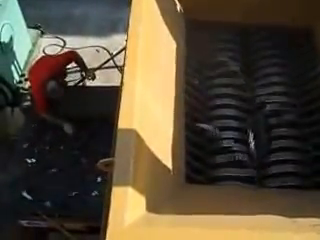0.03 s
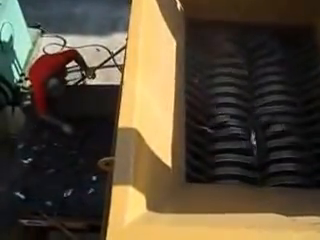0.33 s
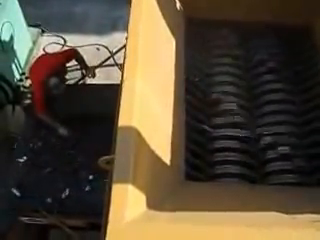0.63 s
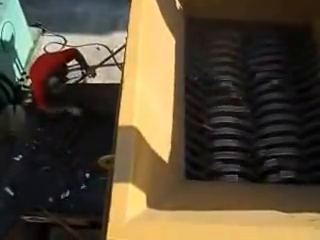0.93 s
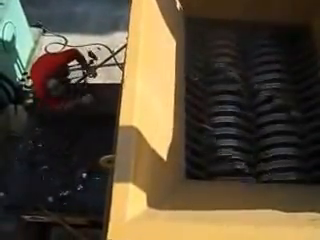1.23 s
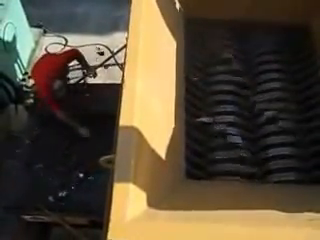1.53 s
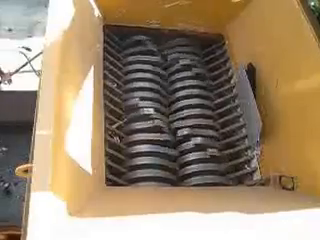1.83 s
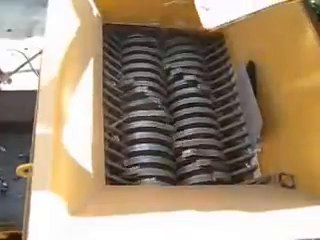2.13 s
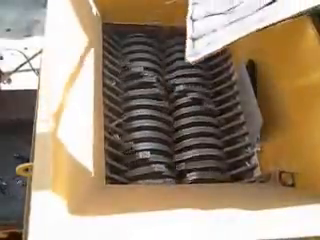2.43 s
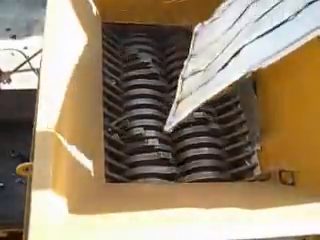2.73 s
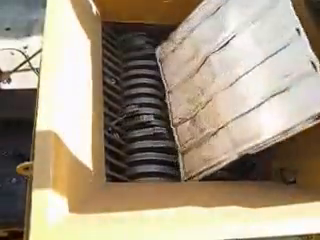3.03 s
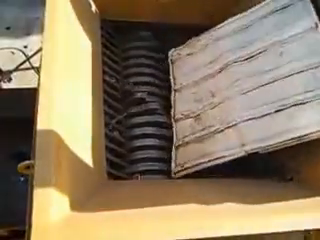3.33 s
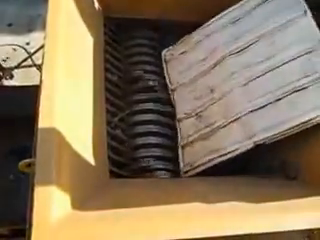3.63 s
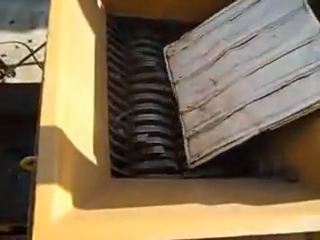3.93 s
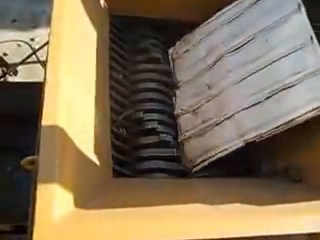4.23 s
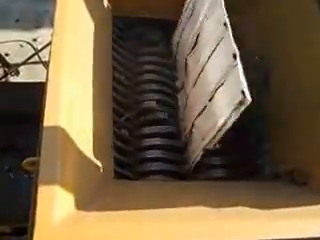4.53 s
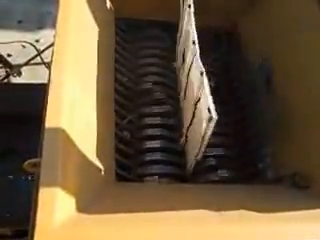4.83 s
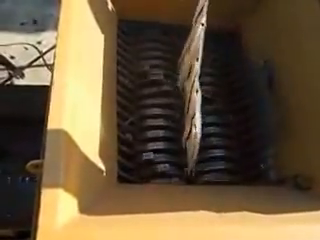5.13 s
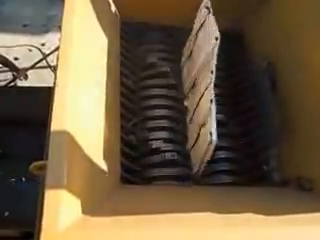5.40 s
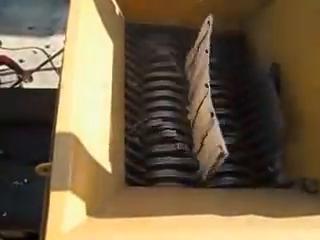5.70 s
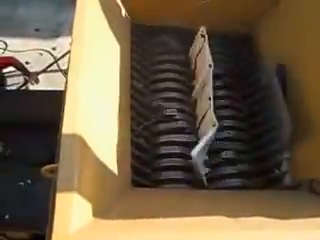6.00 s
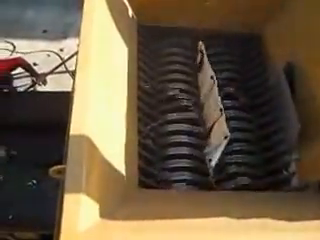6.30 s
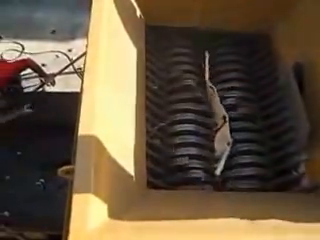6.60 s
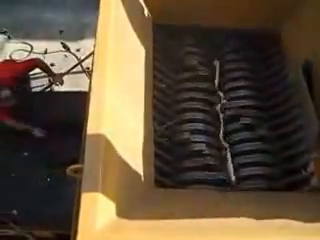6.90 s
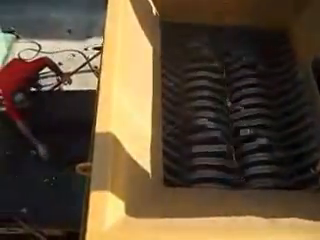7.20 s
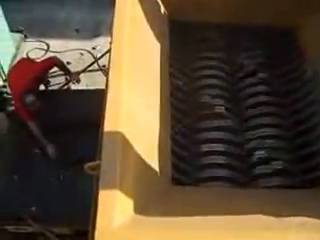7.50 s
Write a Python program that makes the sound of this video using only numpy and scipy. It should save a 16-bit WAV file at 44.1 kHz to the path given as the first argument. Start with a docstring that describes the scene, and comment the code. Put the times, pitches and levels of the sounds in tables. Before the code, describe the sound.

A large scrap shredder runs in a yard with a throbbing engine roar, rattling cutters, a thin pump whistle and a few light clinks. About three seconds in, a metal panel lands in the steel hopper and is dragged through with loud, irregular booms, clangs, scrapes and crunches. The last strip gives a brief high squeal, and the machine runs on. The microphone is close above the hopper.

```python
"""A twin-shaft scrap shredder roars and throbs in a yard, its cutters rattling and its pump whistling.
A ribbed metal panel drops into the steel hopper. The cutters drag it in, buckle it with booms and tear it
with crunches: runs of tiny fractures excite the modes of the panel and the ring of the hopper walls.
The last strip squeals between the discs by stick-slip friction.
The limiter of a camera above the hopper holds the loud moments down."""
import sys
import numpy as np
from scipy import signal
from scipy.fft import rfft, irfft, next_fast_len
from scipy.io import wavfile
from scipy.ndimage import uniform_filter1d, map_coordinates

SR = 44100
rng = np.random.default_rng(int(sys.argv[2]) if len(sys.argv) > 2 else 0)


def unload_audio(sound):
    """Save the sound as a 16-bit wav file, at the path given as the first command line argument."""
    columns = np.transpose(np.atleast_2d(sound))
    # keep every value between -1 and 1, then stretch to whole-number steps
    steps = np.round(np.clip(columns, -1, 1) * 32767)
    wavfile.write(sys.argv[1], SR, steps.astype(np.int16))


N = 341775

# the running machine: time_s, engine_db, rattle_db
MACHINE_LEVELS = [(0, -28, -26), (1.2, -27.5, -27.5), (1.6, -28.5, -27.5), (2.2, -29, -29),
                  (2.9, -28, -28.5), (3.5, -25, -30), (5.8, -27.5, -28.5), (6.5, -27, -26), (7.3, -28, -28),
                  (7.75, -29, -28.5)]
# spectrum of the engine: frequency_hz, gain_db
ENGINE_SPECTRUM = [(25, -42), (45, -29), (65, -14.5), (120, -9.5), (180, -6), (250, 0), (340, -1.5),
                   (440, 0), (600, -3), (930, 0.5), (1500, -2), (2000, -4.5), (3500, -16), (8000, -44)]
# spectrum of the empty cutters: frequency_hz, gain_db
RATTLE_SPECTRUM = [(500, -47), (1200, -9.5), (1750, -1), (2000, -4), (2400, 0.5), (2800, 1), (3200, -2),
                   (3900, -4.5), (4900, -8), (5800, -14.5), (7500, -15.5), (9000, -18), (10000, -23.5),
                   (11000, -48)]
# modes of the cutter discs: pitch_hz, gain_db
DISC_MODES = [(2155, -2), (2385, 1), (2735, -1), (2830, -1), (2940, -6)]
# narrow resonances of the running machine: pitch_hz, half_width_hz, level_db
WHINE_RESONANCES = [(66, 7.4, -60), (256.4, 9.3, -50.5), (272, 7.2, -46.5), (435, 37, -42.5),
                    (736, 18, -46), (890, 43, -42), (985, 15, -48), (1154, 24, -41.5), (1363, 18, -44)]
# the hydraulic pump's whistle: time_s, level_db
PUMP_LEVELS = [(0, -41), (.5, -39.5), (1.12, -35), (1.4, -40), (1.7, -40), (2.1, -52), (7.75, -44)]
# loose scraps strike the empty cutters: start_s, level_db, pitch_hz
SCRAP_CLINKS = [(.445, -37, 1290), (.772, -38, 1400), (.776, -31, 3200), (1.078, -28, 1890),
                (1.145, -28, 2130), (1.378, -33, 2300), (1.742, -28, 2000), (2.68, -30, 2760)]
# the panel skids over the teeth uncaught: start_s, length_s, grind_db, scrape_db
PANEL_SKIDS = [(3.015, 0.062, -29, -27.5), (3.144, 0.07, -26.5, -31), (3.456, 0.14, -23.5, -33),
               (3.675, 0.042, -23.5, -34), (4.092, 0.13, -19, -27.5), (4.224, 0.075, -24, -29.5),
               (5.125, 0.03, -42, -29.5), (5.406, 0.056, -27, -26), (5.96, 0.05, -42, -27.5),
               (6.39, 0.066, -22, -28)]
# the panel in the cutters, flexing less as it gets shorter: time_s, flex_db, grind_db
FEED_LEVELS = [(3.03, -37, -33), (3.25, -26, -26), (3.41, -32.5, -39), (3.92, -27.5, -27),
               (4.25, -29.5, -26), (4.62, -27, -32), (5.1, -35.5, -32), (5.82, -32.5, -33.5),
               (6.75, -38, -29), (7.3, -53, -39)]
# low modes of the panel: pitch_hz, gain_db, t60_s
PANEL_MODES = [(68, -28, 0.18), (130, -13.5, 0.3), (185, -7.5, 0.33), (224.5, -5, 0.26), (245, -5, 0.35),
               (301.6, -1, 0.27), (326, -7, 0.12), (369.4, 1, 0.17), (411, 0, 0.14), (455, 1, 0.16),
               (527, -4.5, 0.093)]
# the whole panel rings low; crumpled and shorter, it rings higher: time_s, favoured_hz
CRUMPLE_PITCH = [(3.1, 240), (3.75, 215), (4.1, 215), (4.25, 312), (7.3, 352)]
# spectra of crumpling metal, from dull to bright: frequency_hz, gain_db
THUD_SPECTRUM = [(35, -36), (70, -22), (100, -12), (135, -4), (250, -1), (490, -1.5), (640, -14),
                 (1300, -32.5)]
CLANG_SPECTRUM = [(30, -22), (100, -12), (300, -18), (500, -3), (680, -1), (900, 1.5), (1200, -0.5),
                  (1750, 0), (2100, -8.5), (2800, -11.5), (5000, -39), (10000, -63)]
CRACK_SPECTRUM = [(500, -44), (1500, -0.5), (2700, 5.5), (4000, 1.5), (5000, -6.5), (6200, -9.5),
                  (8500, -11), (10500, -24)]
# the sheet rips along a cutter's edge: start_s, tearing_s, crack_db, clang_db
SHEET_RIPS = [(3.024, 0.027, -23, -22.5), (3.195, .025, -26, -20), (3.068, 0.037, -36, -21),
              (3.525, 0.023, -30, -32), (4.047, 0.012, -27, -37), (4.345, 0.05, -26, -29),
              (4.416, 0.054, -22, -33), (4.657, 0.015, -32, -28), (4.796, 0.031, -22, -19),
              (4.979, 0.061, -28.5, -28), (5.159, 0.022, -31, -30), (5.32, 0.02, -27.5, -25),
              (5.514, 0.019, -26, -20), (6.195, 0.032, -29, -25), (7.24, 0.024, -29, -29),
              (7.368, 0.038, -29, -29), (7.606, 0.039, -24.5, -41)]
# the panel drones while it lies on the cutters: time_s, level_db
DRONE_LEVELS = [(3.15, -44), (3.73, -42.5), (3.8, -39), (3.99, -37), (4.06, -43), (4.35, -40)]
# modes that groan as the sheet is dragged in: pitch_hz, half_width_hz, gain_db
DRONE_MODES = [(127.4, 5, 1), (231, 12, 4), (297, 7.4, 4.5)]
# a tooth buckles the panel:
# start_s, tearing_s, clang_db, clang_hz, crack_db, boom_db, boom_hz, breadth_log_pitch
TOOTH_BITES = [(3.16, .04, -23, 1100, -30, -28.5, 190, .6), (3.228, 0.032, -27, 1100, -42, -21.5, 227, 0.1),
               (3.452, .02, -24, 1080, -25, -26, 380, .4), (3.474, 0.028, -21, 720, -34, -19.5, 410, 0.37),
               (3.51, 0.032, -19, 720, -27, -23, 450, 0.59), (3.548, 0.049, -25, 1100, -30, -21, 368, .45),
               (3.7, 0.023, -23, 900, -37, -26.5, 440, 0.24),
               (3.768, 0.062, -21, 1100, -31, -21, 243, 0.44),
               (3.885, .02, -30, 950, -38, -28.5, 250, 0.32), (3.94, .02, -26, 950, -47, -29, 260, 0.66),
               (3.995, .02, -30, 950, -38, -28, 270, .4), (4.135, .028, -18, 1300, -32, -22, 380, 0.66),
               (4.175, 0.038, -22, 1050, -25, -21.5, 248, 0.22),
               (4.385, .025, -29, 1200, -27, -21.5, 350, .35), (4.425, 0.023, -21, 1100, -30, -25, 236, .3),
               (4.52, 0.038, -17.5, 1150, -21, -17.5, 340, 0.28),
               (4.562, 0.0097, -20, 900, -27, -21, 310, 0.48),
               (4.63, 0.022, -35, 1100, -45, -25.5, 340, 0.48),
               (4.697, 0.014, -17, 1500, -23.5, -18, 440, .4),
               (4.795, 0.023, -26, 1110, -33, -22, 340, 0.16),
               (4.845, 0.023, -25, 1000, -32, -16, 307, 0.28),
               (5.03, 0.042, -15, 1390, -22.5, -19.5, 300, 0.89),
               (5.208, .022, -20.5, 1000, -27, -18, 322, 0.11),
               (5.364, 0.045, -20, 1100, -44, -28, 300, 0.54), (5.564, 0.014, -22, 1110, -37, -37, 303, .5),
               (5.734, 0.031, -18.5, 1020, -29, -14.5, 320, .65),
               (5.911, .033, -24, 1000, -27, -24, 280, .6),
               (6.089, 0.012, -19.5, 1000, -27, -20.5, 210, 0.61),
               (6.245, 0.013, -36, 1110, -42, -26.5, 305, 0.34),
               (6.408, 0.021, -22.5, 1200, -26, -24, 370, 0.35),
               (6.445, .028, -21, 1200, -29, -25, 427, .4), (6.463, .012, -25, 1110, -33, -21, 410, 0.23),
               (6.643, 0.013, -22.5, 1110, -31, -23, 350, 0.45),
               (6.791, 0.019, -24, 1110, -34, -26, 400, 0.44), (6.828, 0.021, -25, 1400, -26, -41, 400, .5)]
# squeaks and groans of a caught edge: start_s, length_s, pitch_hz, glide_octaves, peak_db
EDGE_SQUEAKS = [(3.451, .018, 1184, -0.016, -15), (3.458, 0.016, 844, -.55, -16),
                (3.576, .016, 930, -0.078, -21), (4.075, 0.099, 758, 0.46, -24),
                (4.326, .016, 3020, 0, -21), (4.335, .055, 1200, .32, -22), (4.35, .018, 3720, -0.18, -24),
                (4.378, 0.013, 2830, -.1, -21), (4.973, 0.044, 3900, 0, -31),
                (5.16, 0.031, 1500, -0.21, -20), (5.427, .02, 3300, 0, -25),
                (6.208, 0.021, 2360, -0.038, -20), (6.504, 0.019, 2790, 0.019, -18.5),
                (6.908, .025, 2640, 0.015, -26), (6.965, 0.027, 2330, 0.014, -15.5),
                (6.966, 0.022, 9680, 0, -39), (6.985, 0.039, 5400, .05, -31), (6.987, .05, 9050, .03, -41),
                (7.008, 0.036, 2950, 0, -19.5), (7.022, 0.05, 2294, 0, -25)]
# the last strip screeches in two modes: time_s, lower_hz, upper_hz
SQUEAL_PITCHES = [(6.915, 3600, 8200), (6.94, 4080, 7950), (6.963, 4150, 7760), (6.998, 3850, 8100),
                  (7.02, 4080, 7950), (7.046, 3650, 8350), (7.059, 4080, 7900), (7.068, 4150, 8150)]

TIME_S = np.arange(N) / SR


def amp(db):
    """Decibels to amplitude ratio."""
    return 10 ** (np.asarray(db) / 20)


def unit(x):
    """Scale to rms 1."""
    return x / np.sqrt(np.mean(x ** 2) + 1e-20)


def unit_burst(x):
    """Scale so that the loudest 25 ms have rms 1."""
    return x / np.sqrt(uniform_filter1d(x ** 2, SR // 40).max())


def gain_at(spectrum, hz):
    """Amplitude gain of a spectrum, interpolated over log frequency."""
    knots_hz, db = np.transpose(spectrum)
    return amp(np.interp(np.log(hz + 1), np.log(knots_hz + 1), db))


def bell(hz, centre_hz, breadth):
    """A Gaussian over log pitch, 1 at the centre."""
    return np.exp(-(np.log((hz + 1) / centre_hz) / breadth) ** 2)


def curves(rows):
    """Linear interpolation, per sample, of each column after the time."""
    times_s, *columns = np.transpose(rows)
    return [np.interp(TIME_S, times_s, column) for column in columns]


def during(rows, fade_s):
    """A gate: 1 while a table lasts, fading to 0 outside it."""
    start, end = rows[0][0], rows[-1][0]
    return np.interp(TIME_S, [start - fade_s, start, end, end + fade_s], [0, 1, 1, 0])


def wobble(rate_hz):
    """Smooth random modulation: a spline through Gaussian knots."""
    knots = rng.standard_normal(int(N * rate_hz / SR) + 4)
    return map_coordinates(knots, [TIME_S * rate_hz])


def phase_of(hz):
    """Phase is the time integral of frequency."""
    return 2 * np.pi * np.cumsum(hz) / SR


def filtered(x, response):
    """Linear filtering: the spectrum of x times a frequency response."""
    size = next_fast_len(len(x) + 8192)
    return irfft(rfft(x, size) * response(np.fft.rfftfreq(size, 1 / SR)), size)[:len(x)]


def coloured(x, spectrum):
    """Spectral shaping, at rms 1."""
    return unit(filtered(x, lambda hz: gain_at(spectrum, hz)))


def resonances(modes):
    """Narrow resonances, each driven by its own white noise."""
    track = np.zeros(N)
    for pitch_hz, half_width_hz, db in modes:
        band = filtered(rng.standard_normal(N), lambda hz: 1 / (1 + ((hz - pitch_hz) / half_width_hz) ** 2))
        track += amp(db) * unit(band)
    return track


def impulses(size, per_s):
    """Shot noise: tiny fractures or impacts of random time and strength, at rms 1."""
    return unit((rng.random(size) < per_s / SR) * rng.standard_normal(size))


def add(track, start_s, sound):
    """Superpose a sound on the track."""
    part = track[round(start_s * SR):][:len(sound)]
    part += sound[:len(part)]


def shifting(x, ring_at):
    """Time-varying convolution: the metal moves, so each cross-faded stretch meets its own ring."""
    hop, track = SR // 7, np.zeros(N)
    padded, fade = np.pad(x, (0, 2 * hop)), np.sqrt(np.hanning(2 * hop))
    for start in range(0, N, hop):
        stretch = padded[start:start + 2 * hop] * fade
        add(track, start / SR, signal.fftconvolve(stretch, ring_at((start + hop) / SR)))
    return track


def walls(t60_s, wet_db):
    """Impulse response of the steel hopper: direct sound and a short, dense tail."""
    t = np.arange(SR // 4) / SR
    tail = rng.standard_normal(len(t)) * amp(-60 * t / t60_s) * (t > .002)
    return (t == 0) + amp(wet_db) * tail / np.linalg.norm(tail)


def in_hopper(x, t60_s, wet_db):
    """Reverberation of one short sound between the hopper walls."""
    return signal.fftconvolve(x, walls(t60_s, wet_db))[:len(x)]


def engine_roar(throb_db):
    """Amplitude modulation of broadband noise makes the engine throb."""
    return coloured(amp(throb_db) * rng.standard_normal(N), ENGINE_SPECTRUM)


def cutter_rattle(throb_db):
    """Dense impacts reverberate in the hopper and merge with noise into a rattle."""
    impacts = impulses(N, per_s=1500) * amp(wobble(25))
    ticks = shifting(impacts, lambda s: walls(t60_s=.11, wet_db=1.5))
    return coloured(amp(throb_db) * (rng.standard_normal(N) + .41 * ticks), RATTLE_SPECTRUM)


def disc_ring(throb_db, t60_s=.12):
    """Free vibration of struck cutter discs; the point of contact sets the strength of each mode."""
    t = np.arange(SR // 5) / SR
    hz, db = np.transpose(DISC_MODES)[:, :, None]

    def ring_at(s):
        modes = amp(db + 3 * rng.standard_normal(hz.shape)) * np.sin(2 * np.pi * hz * t)
        return unit(modes.sum(0) * amp(-60 * t / t60_s))

    return unit(shifting(impulses(N, per_s=60) * amp(throb_db), ring_at))


def pump_whistle(throb_db, pitch_hz=2236, waver=.0062):
    """The hydraulic pump's tone, modulated in amplitude and slightly in frequency."""
    tone = np.sin(phase_of(pitch_hz * (1 + waver * wobble(120))))
    return unit(amp(throb_db + 1.5 * wobble(20)) * tone)


def machine(cycle_hz=13.7, first_throb_s=.067):
    """Common modulation: engine, cutters and pump throb in one cycle, under the fan's steady whine."""
    engine_db, rattle_db = curves(MACHINE_LEVELS)
    pump_db, = curves(PUMP_LEVELS)
    cycle = 2 * np.pi * cycle_hz * (TIME_S - first_throb_s) + .42 * wobble(2.7)
    throb = np.cos(cycle) * (1 - .5 * during(FEED_LEVELS, fade_s=.22))  # half as deep under load
    flutter_db = .41 * np.sin(6 * cycle) + .34 * wobble(30)  # six firings a cycle
    roar = amp(engine_db) * engine_roar(throb_db=.4 * throb + flutter_db)
    rattle = amp(rattle_db) * cutter_rattle(throb_db=1.05 * throb + flutter_db)
    discs = amp(rattle_db - 12.5) * disc_ring(throb_db=6 * throb)
    pump = amp(pump_db) * pump_whistle(throb_db=6 * throb)
    fan = resonances(WHINE_RESONANCES)
    return roar + rattle + discs + pump + fan


def clinks(mode_count=9, log_spread=.17, chatter_s=.0047, t60_s=.11):
    """Impact excitation: a scrap chatters on a disc and rings in its own inharmonic modes."""
    track, t = np.zeros(N), np.arange(SR // 5) / SR
    for start_s, level_db, pitch_hz in SCRAP_CLINKS:
        modes_hz = pitch_hz * np.exp(log_spread * rng.standard_normal((mode_count, 1)))
        ring = np.sin(2 * np.pi * modes_hz * t).sum(0) * amp(-60 * t / t60_s)
        contacts = impulses(len(t), per_s=1800) * np.exp(-t / chatter_s)
        chatter = in_hopper(contacts, t60_s=.08, wet_db=-6)
        add(track, start_s, amp(level_db) * unit_burst(signal.fftconvolve(chatter, ring)[:len(t)]))
    return track


def skid_gains(attack_s=.0088, release_s=.046):
    """Envelopes of sliding friction, for grinding and scraping: rise, hold and exponential decay."""
    grind, scrape = np.zeros(N), np.zeros(N)
    for start_s, length_s, grind_db, scrape_db in PANEL_SKIDS:
        t = TIME_S - start_s
        stroke = np.clip(t / attack_s, 0, 1) * np.exp(-np.maximum(t - length_s, 0) / release_s)
        grind += amp(grind_db) * stroke
        scrape += amp(scrape_db) * stroke
    return grind, scrape


def panel_ring(detune, favoured_hz, focus_db, breadth, damping_db_per_s):
    """Damped modes of the panel; each bend detunes them and lifts those near favoured_hz."""
    t = np.arange(SR // 3) / SR
    hz, db, t60_s = np.transpose(PANEL_MODES)[:, :, None]
    shift, polarity = rng.standard_normal((2, len(PANEL_MODES), 1))
    envelope_db = db + focus_db * bell(hz, favoured_hz, breadth) - (60 / t60_s + damping_db_per_s) * t
    modes = np.sign(polarity) * np.cos(2 * np.pi * hz * (1 + detune * shift) * t)
    return np.sum(amp(envelope_db) * modes, 0)


def flexing(slip):
    """Bending vibration: jolts of fracture shake the panel's modes, and creases add unpitched thuds."""
    def ring_at(s):
        favoured_hz = np.interp(s, *np.transpose(CRUMPLE_PITCH))
        detune = .021 * (favoured_hz / 300) ** 2
        return unit(panel_ring(detune, favoured_hz, focus_db=3, breadth=.22, damping_db_per_s=45))

    jolts = impulses(N, per_s=900) * amp(1.2 * wobble(40))
    ringing = unit(shifting(jolts, ring_at))
    creases = coloured(impulses(N, per_s=300) * amp(1.9 * slip), THUD_SPECTRUM)
    return unit(ringing + amp(-3.5) * creases)


def grinding(slip):
    """Reverberation in the hopper blurs dense fractures into a midrange grind."""
    fractures = impulses(N, per_s=1500) * amp(.65 * slip)
    return coloured(shifting(fractures, lambda s: walls(t60_s=.23, wet_db=-.5)), CLANG_SPECTRUM)


def burr_chirps(centre_hz=3254, log_spread=.3, count=520, median_s=.0156):
    """Friction of burrs catching on the discs: brief gliding tones at random moments, at rms 1."""
    track = np.zeros(N)
    for when, (pitch, glide, life, size) in zip(rng.random(count), rng.uniform(-1, 1, (count, 4))):
        progress = np.linspace(0, 1, int(median_s * SR * np.exp(.77 * life)))
        hz = centre_hz * np.exp(log_spread * pitch + .118 * glide * progress)
        add(track, when * N / SR, amp(3.2 * size) * np.sin(np.pi * progress) * np.sin(phase_of(hz)))
    return unit(track)


def scraping(slip):
    """Sliding friction: a bright, uneven stream of tiny fractures, with chirping burrs."""
    fractures = impulses(N, per_s=3000) * amp(1.9 * slip + 3.5 * wobble(18))
    hiss = coloured(shifting(fractures, lambda s: walls(t60_s=.044, wet_db=17)), CRACK_SPECTRUM)
    return unit(hiss + .29 * burr_chirps())


def panel_feed():
    """The panel flexes, grinds and scrapes over the teeth; feed and skids add in power."""
    flex_db, grind_db = curves(FEED_LEVELS)
    since_touch_s = TIME_S - FEED_LEVELS[0][0]
    scrape_db = grind_db - 11.5 + 2.5 * since_touch_s  # ever more metal lies between the discs
    skid_grind, skid_scrape = skid_gains()
    slip = wobble(28)
    flex = np.hypot(amp(flex_db), amp(-11) * skid_grind) * flexing(slip)
    grind = np.hypot(amp(grind_db), skid_grind) * grinding(slip)
    scrape = np.hypot(amp(scrape_db), skid_scrape) * scraping(slip)
    return during(FEED_LEVELS, fade_s=.014) * (flex + grind + scrape)


def tear(tearing_s, boom_db, clang_db, crack_db, boom_hz, breadth, clang_hz, attack_s=.0011):
    """Source and filter: one run of fractures booms in the tooth-damped panel, clangs and cracks."""
    t = np.arange(SR // 3) / SR
    envelope = (1 - np.exp(-t / attack_s)) * np.exp(-(t / tearing_s) ** 2)
    fractures = envelope * impulses(len(t), per_s=1800)
    fractures[SR // 400] += .24 * np.linalg.norm(fractures)  # one snap, 2.5 ms in
    ring = panel_ring(detune=.043, favoured_hz=boom_hz, focus_db=11.5, breadth=breadth,
                      damping_db_per_s=320)
    ringing = signal.fftconvolve(fractures, ring)[:len(t)]
    thud = in_hopper(fractures, t60_s=.17, wet_db=-1)
    thud = filtered(thud, lambda hz: gain_at(THUD_SPECTRUM, hz) * np.sqrt(bell(hz, boom_hz, breadth)))
    boom = unit_burst(ringing) + amp(3) * unit_burst(thud)
    clang = coloured(in_hopper(fractures, t60_s=.18, wet_db=1.5), CLANG_SPECTRUM)
    clang = filtered(clang, lambda hz: amp(12.3 * bell(hz, clang_hz, .75)))  # the torn flap's own pitch
    crack = coloured(in_hopper(fractures, t60_s=.13, wet_db=1), CRACK_SPECTRUM)
    return (amp(boom_db) * unit_burst(boom) + amp(clang_db) * unit_burst(clang)
            + amp(crack_db) * unit_burst(crack))


def rips():
    """Tensile fracture: the stretched sheet splits with a bright crunch and little boom."""
    track = np.zeros(N)
    for start_s, tearing_s, crack_db, clang_db in SHEET_RIPS:
        boom_db = clang_db - 8.5
        rip = tear(tearing_s, boom_db, clang_db, crack_db, boom_hz=330, breadth=.48, clang_hz=1480)
        add(track, start_s, rip)
    return track


def panel_drone():
    """Forced vibration: the teeth keep a few low modes of the uncut panel humming."""
    level_db, = curves(DRONE_LEVELS)
    return during(DRONE_LEVELS, fade_s=.08) * amp(level_db) * resonances(DRONE_MODES)


def bites():
    """Buckling: the panel gives way under each tooth with a crack, a clang and a boom."""
    track = np.zeros(N)
    for start_s, tearing_s, clang_db, clang_hz, crack_db, boom_db, boom_hz, breadth in TOOTH_BITES:
        add(track, start_s, tear(tearing_s, boom_db, clang_db, crack_db, boom_hz, breadth, clang_hz))
    return track


def squeaks():
    """Stick-slip of a caught edge: short gliding tones with a weak second harmonic."""
    track = np.zeros(N)
    for start_s, length_s, pitch_hz, glide_octaves, peak_db in EDGE_SQUEAKS:
        progress = np.linspace(0, 1, int(length_s * SR))
        jitter = 1 + .016 * wobble(590)[:len(progress)]
        phase = phase_of(pitch_hz * 2 ** (glide_octaves * (progress - .5)) * jitter)
        tone = np.sin(phase) + amp(-23) * np.sin(2 * phase)
        add(track, start_s, amp(peak_db) * np.sin(np.pi * progress) * tone)
    return track


def strip_squeal(middle_db=-25.5, taper_db=4.5):
    """Stick-slip of steel on steel: two wavering modes screech over a rasp, swelling and easing."""
    lower_hz, upper_hz = curves(SQUEAL_PITCHES)
    lower = np.sin(phase_of(lower_hz * (1 + .037 * wobble(1100))))
    upper = np.sin(phase_of(upper_hz * (1 + .016 * wobble(1100))))
    chatter = 1 + .6 * wobble(450)
    screech = unit(chatter * (lower + amp(-12) * upper))
    rasp = coloured(impulses(N, per_s=6000), CRACK_SPECTRUM)
    from_middle = np.interp(TIME_S, [SQUEAL_PITCHES[0][0], SQUEAL_PITCHES[-1][0]], [-1, 1])
    swell = during(SQUEAL_PITCHES, fade_s=.01) * amp(middle_db - taper_db * from_middle ** 2)
    return swell * (screech + amp(-3.5) * rasp)


def scene():
    """Superposition of the machine and the panel that it shreds, in one channel."""
    mix = machine() + clinks() + panel_feed() + panel_drone() + bites() + rips()
    return (mix + strip_squeal() + squeaks())[None]


def limiter(x, ceiling_db, knee_db, averaging_s, depth):
    """Compression: running mean power turns the gain down, and soft clipping rounds off the peaks."""
    pole = np.exp(-1 / (averaging_s * SR))
    power = signal.lfilter([1 - pole], [1, -pole], x ** 2)
    x = x * (1 + (power / amp(2 * knee_db)) ** 2) ** (-depth / 4)
    return x / (1 + np.abs(x / amp(ceiling_db)) ** 6) ** (1 / 6)


def asymmetry(x, skew, corner_hz):
    """Quadratic distortion bends the half-waves unequally, so loud moments leave a low rumble."""
    return x - skew * filtered(x ** 2, lambda hz: 1j * hz / (corner_hz + 1j * hz))


def record(dry):
    """Limiting, slight distortion and a steep low-pass in the camera."""
    cutoff_hz = 10750
    held = limiter(dry[0], ceiling_db=-11, knee_db=-17, averaging_s=.1, depth=.53)
    bent = asymmetry(held, skew=.27, corner_hz=20)
    return filtered(bent, lambda hz: 1 / np.sqrt(1 + (hz / cutoff_hz) ** 120))[None]


dry = scene()
out = record(dry)
unload_audio(out)
```